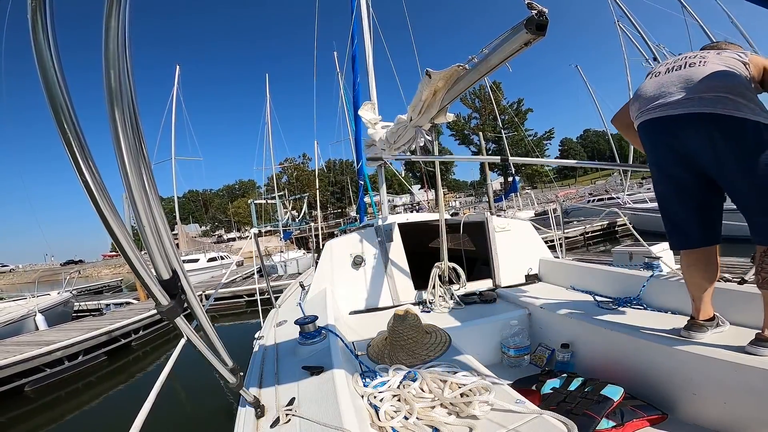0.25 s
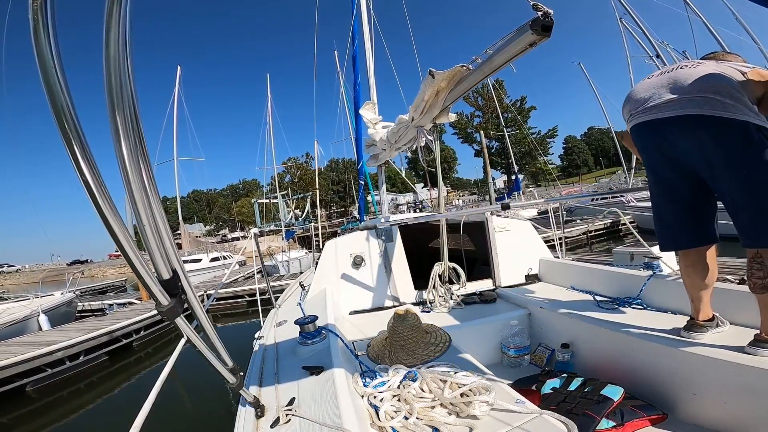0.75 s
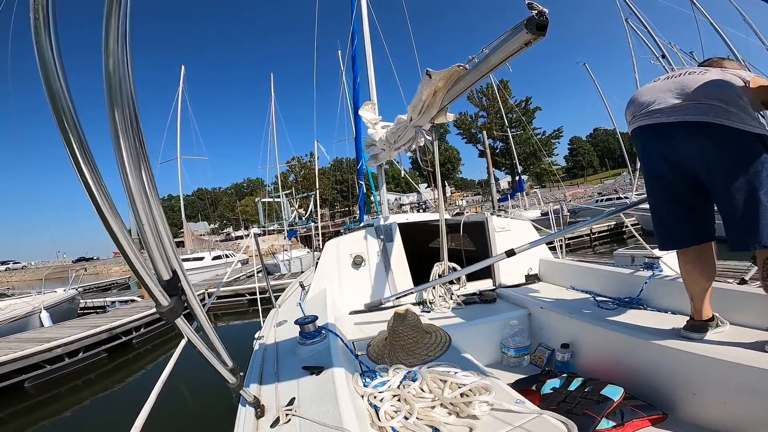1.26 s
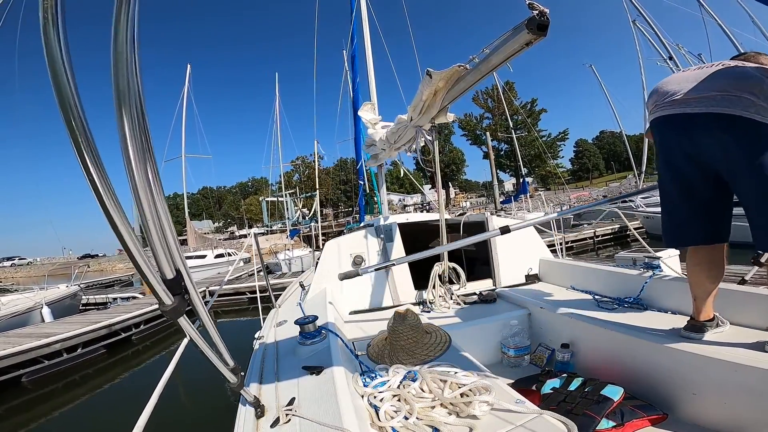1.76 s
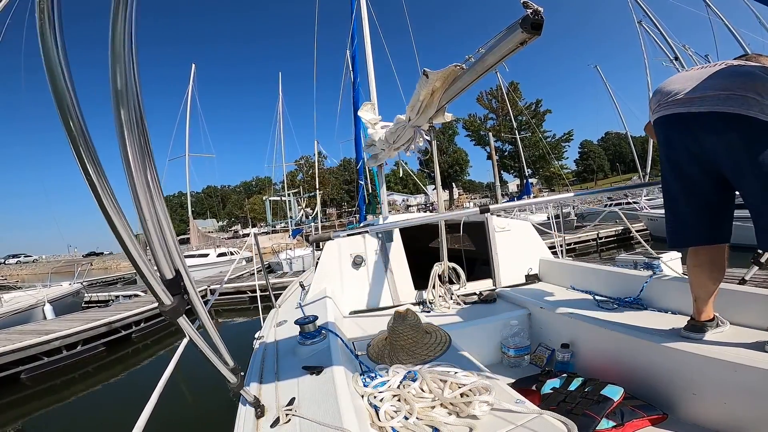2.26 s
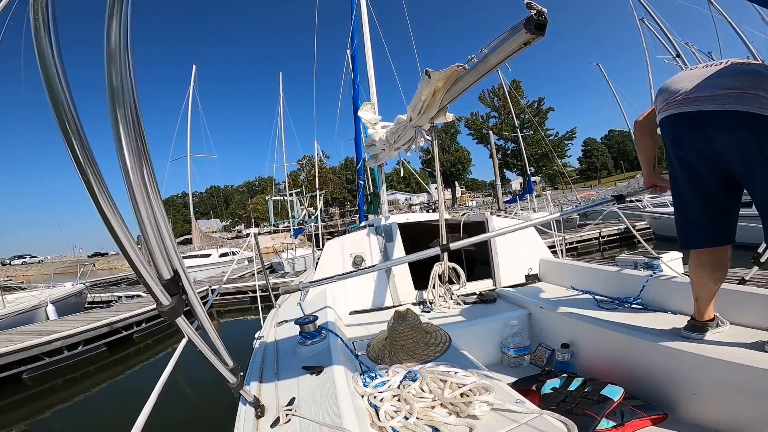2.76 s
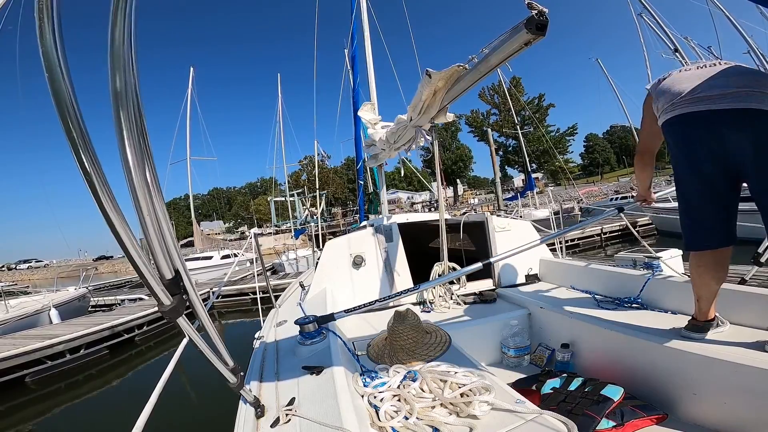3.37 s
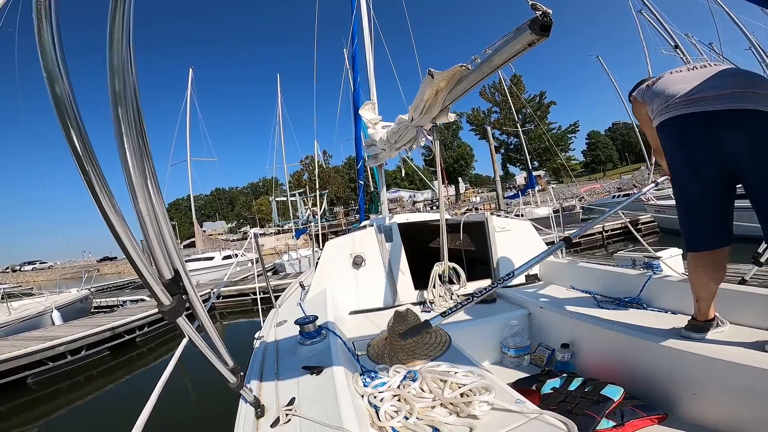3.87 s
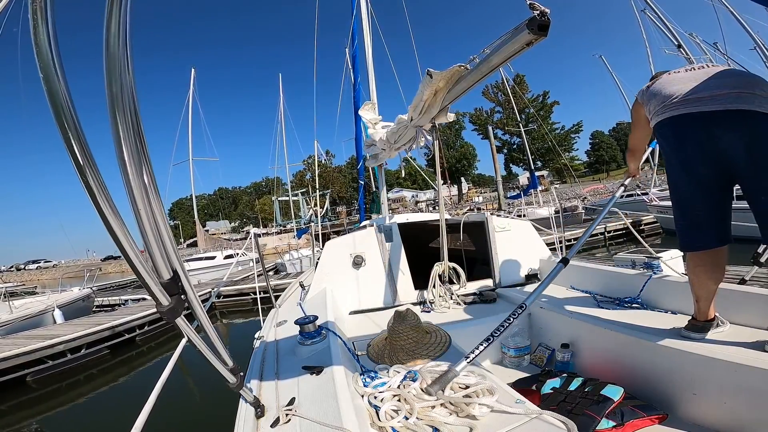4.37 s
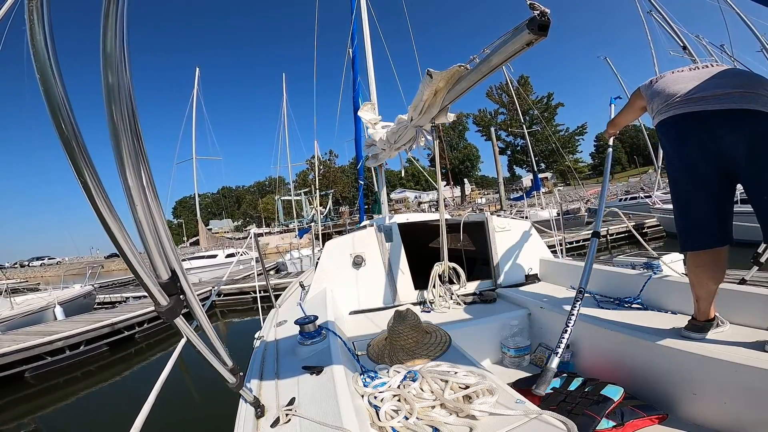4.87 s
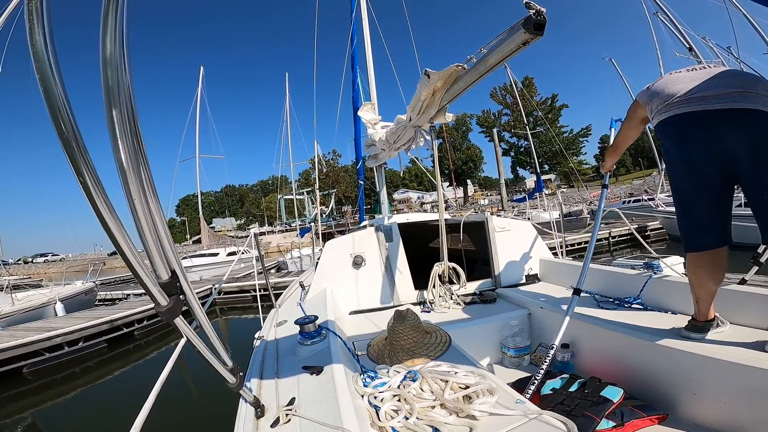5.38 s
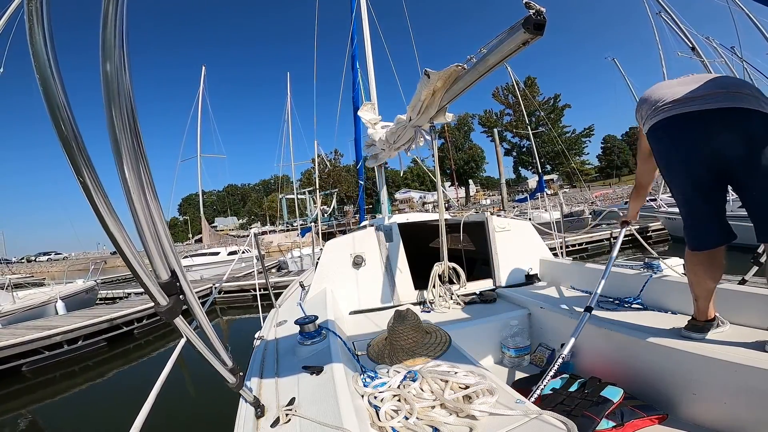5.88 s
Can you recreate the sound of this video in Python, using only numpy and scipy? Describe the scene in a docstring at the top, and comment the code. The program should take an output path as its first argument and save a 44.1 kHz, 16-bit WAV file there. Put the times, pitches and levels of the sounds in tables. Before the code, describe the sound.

Sparse hollow clatters of an aluminium pole on a boat, one hard clang with a metallic ring midway, later dull thuds, low wind rumble beneath.

```python
"""A metal pole swung about aboard a small moored yacht knocks on deck and fittings: short tube rings, deck rattle.
The hull booms under the blows in late, detuned panel modes; one blow rings a winch, a loose shackle tinkles.
A slack line chuffs against the mast in shaped noise, and the pole tip drags once over cloth in fine grains.
Noise-band whistles, gusty wind rumble, far hiss and a wavering hum lie beneath; cockpit and boats echo the blows."""
import sys
import numpy as np
from scipy import signal
from scipy.fft import rfft, irfft
from scipy.io import wavfile
from scipy.ndimage import uniform_filter1d

SR = 44100
rng = np.random.default_rng(int(sys.argv[2]) if len(sys.argv) > 2 else 0)


def volts_from_decibels(level):
    """Turn decibel levels (scalar or array-like) into linear amplitude factors."""
    exponent = np.asarray(level, float) / 20
    return 10 ** exponent


def bounce(signal):
    """Save signal as a 16-bit WAV file at the path given by the first command-line argument."""
    frames = np.transpose(np.atleast_2d(signal))
    limited = np.clip(frames, -1, 1)
    pcm = np.round(limited * 32767).astype(np.int16)
    wavfile.write(sys.argv[1], SR, pcm)


N = 270333
T = np.arange(N) / SR


def unit(x):
    """Scale to rms 1."""
    return x / np.sqrt(np.mean(x ** 2))


def on_log(table, hz):
    """Read a two-column curve on a log-frequency axis."""
    f, value = np.transpose(table)
    return np.interp(np.log(np.maximum(hz, 1)), np.log(f), value)


# stereo width of the noise beds: f/Hz, left-right likeness (0-1)
NOISE_LIKENESS = [(20, 0.7), (60, 1), (150, 0.97), (500, .8), (1500, 0.75), (4000, 0.04), (9000, 0.87)]


def noise(colour):
    """Stereo noise of rms 1 in the given colour; shared mid and opposed side set its width by frequency."""
    hz = np.arange(N // 2 + 1) * SR / N
    like = np.clip(on_log(NOISE_LIKENESS, hz), 0, 1)
    mid, side = rfft(rng.standard_normal((2, N)))
    left_right = np.array([[1], [-1]])
    pair = mid * np.sqrt(1 + like) + side * np.sqrt(1 - like) * left_right
    return unit(irfft(pair * volts_from_decibels(on_log(colour, hz)), N))


def walk(rate):
    """Random control curve of rms 1: levels held 1 / rate s, smoothed twice."""
    hold = int(SR / rate)
    steps = np.repeat(rng.standard_normal(N // hold + 1), hold)
    return unit(uniform_filter1d(uniform_filter1d(steps, hold), hold)[:N])


def wavering(hz, width_hz):
    """Two tones smeared into narrow noise bands by unrelated slow wobbles; joint rms 1."""
    lowpass = signal.butter(2, width_hz / 2, fs=SR, output="sos")
    smear = signal.sosfilt(lowpass, rng.standard_normal((2, 2, len(hz))))
    phase = 2 * np.pi * np.cumsum(hz) / SR
    return unit(smear[0] * np.cos(phase) + smear[1] * np.sin(phase))


def ring(modes, phase, rise_cycles, size):
    """Decaying modes whose swell is timed in cycles, so lows arrive late; scaled to peak 1."""
    hz, db, t60 = np.transpose(modes)[:, :, None]
    t = T[:size]
    swell = (1 - np.exp(-t * hz / rise_cycles)) ** 2
    decay = np.exp(-np.log(1000) * t / t60)
    tones = np.sin(2 * np.pi * hz * t + phase[:len(hz), None])
    out = (volts_from_decibels(db) * swell * decay * tones).sum(0)
    return out / np.abs(out).max()


def add(out, s, x, pan_db=0.):
    """Place a sound at time s; positive pan_db leans it left."""
    i = int(s * SR)
    x = x[:N - i]
    out[:, i:i + len(x)] += x * volts_from_decibels(np.array([[pan_db], [-pan_db]]) / 2)


# background level curves, before random gusts: t/s, wind rumble level/dB, marina hiss level/dB
AIR_LEVELS = [(0.0, -40.5, -53.5), (0.7, -41, -54), (1.0, -40, -54.5), (1.35, -36, -55.5),
              (1.55, -45.5, -55.5), (2.3, -40, -55.5), (2.9, -43.5, -53.5), (3.4, -42.5, -59),
              (4.05, -48, -58.5), (5.17, -46.5, -58.5), (5.4, -43, -58.5), (6.13, -47.5, -59)]
# colour of the wind rumble: f/Hz, level/dB
RUMBLE_COLOUR = [(8.8, -44), (15, -2), (54, -0.5), (81, -5), (119, -5.5), (142, -12.5), (308, -23.5),
                 (362, -37.5), (500, -43.5), (650, -80.5), (1100, -120)]
# colour of the marina hiss: f/Hz, level/dB
HISS_COLOUR = [(180, -9.5), (300, -9), (358, -8.5), (394, -4.5), (589, -9), (726, -5), (955, -5.5),
               (1470, -2.5), (4400, -16.5), (6900, -24), (8370, -26.5), (9670, -36.5), (11000, -56.5),
               (14000, -62.5)]
HUM_HZ, HUM_WIDTH_HZ, HUM_DB = 110.3, 9.0, -52.5


def air():
    """Gusty low noise for wind, smoother noise for far hiss, and a motor hum as a narrow wavering band."""
    s, rumble_db, hiss_db = np.transpose(AIR_LEVELS)
    lean_db = np.array([[.7], [-.7]])  # rumble is a little stronger on the left
    rumble_db = np.interp(T, s, rumble_db) + 3.5 * walk(6.5) + lean_db
    rumble = volts_from_decibels(rumble_db) * noise(RUMBLE_COLOUR)
    hiss_db = np.interp(T, s, hiss_db) + 1.1 * walk(13)
    hiss = volts_from_decibels(hiss_db) * noise(HISS_COLOUR)
    hum = wavering(np.full(N, HUM_HZ), HUM_WIDTH_HZ)[0]
    return rumble + hiss + volts_from_decibels(HUM_DB) * hum


# thin whistles: start t/s, end t/s, start f/Hz, end f/Hz, level/dB (before swell and flutter)
WHISTLE_GLIDES = [(0, .25, 7600, 7800, -69.5), (0.106, 0.531, 8300, 8700, -75),
                  (0.728, 1.155, 6000, 6000, -72), (0.848, 1.087, 8900, 8700, -70.5),
                  (1.001, 1.202, 7960, 9000, -70), (1.4, 1.752, 7800, 8380, -70),
                  (1.55, 1.943, 6230, 6000, -71), (1.697, 2.056, 8400, 8220, -71.5),
                  (2.026, 2.155, 6300, 6430, -69), (2.047, 2.201, 3780, 4000, -71),
                  (2.252, 2.457, 7100, 7050, -69.5), (2.643, 2.8, 7620, 7340, -70.5),
                  (2.778, 2.947, 3700, 3040, -63), (2.8, 2.959, 3960, 3970, -69),
                  (3.379, 3.558, 6700, 6690, -74), (3.677, 3.846, 4100, 3260, -71.5),
                  (3.963, 4.352, 4300, 4870, -72.5), (4.165, 4.28, 6810, 6430, -71),
                  (3.45, 4.04, 7230, 8210, -81.5), (4.6, 4.8, 8570, 8700, -79.5),
                  (4.85, 5.05, 8220, 8620, -78), (5.42, 5.89, 9170, 8150, -81)]
WHISTLE_WIDTH_HZ = 200
# fainter whistles at random times and pitches; level before swell and flutter
FAINT_COUNT, FAINT_DB, FAINT_S = 20, -77, 0.11


def whistles():
    """Faint gliding noise bands in the treble that swell, flutter and fade."""
    out = np.zeros((2, N))
    when = rng.uniform(0, T[-1], FAINT_COUNT)
    pitch = rng.uniform(5800, 8900, FAINT_COUNT)  # Hz
    glide = rng.uniform(-125, 375, FAINT_COUNT)  # Hz, mostly upward
    faint = zip(when, when + FAINT_S, pitch, pitch + glide, np.full(FAINT_COUNT, FAINT_DB))
    for start, end, from_hz, to_hz, db in [*WHISTLE_GLIDES, *faint]:
        share = np.linspace(0, 1, int((end - start) * SR))
        pair = wavering(from_hz + (to_hz - from_hz) * share, WHISTLE_WIDTH_HZ)
        swell = np.sqrt(np.sin(np.pi * share).clip(0))
        add(out, start, volts_from_decibels(db) * swell * (pair[0] + 0.67 * pair[1]))
    flutter = volts_from_decibels(3.0 * walk(25))
    return out * flutter


# colour of the cloth drag: f/Hz, level/dB
CLOTH_COLOUR = [(180, -29), (300, -1.5), (456, 1), (544, -15), (1250, 0.5), (2430, -4.5), (3690, -6),
                (8920, -23), (14000, -39)]
DRAG_S, DRAG_HOLD_S, DRAG_DB = 5.174, 0.067, -45
DRAG_ATTACK_DB_PER_S, DRAG_RELEASE_DB_PER_S = 1600, 293


def drag():
    """Dense fine noise grains while the pole tip slides over cloth."""
    early = np.maximum(DRAG_S - T, 0)
    late = np.maximum(T - DRAG_S - DRAG_HOLD_S, 0)
    db = DRAG_DB - DRAG_ATTACK_DB_PER_S * early - DRAG_RELEASE_DB_PER_S * late
    return volts_from_decibels(db + 1.6 * walk(180)) * noise(CLOTH_COLOUR)


# single brushes of the line: t/s, level/dB (before grain), length/s
SINGLE_BRUSHES = [(0.772, -61, .2), (1.195, -44, 0.06), (1.29, -54, 0.09), (1.392, -53.5, 0.054),
                  (4.127, -65, 0.045), (4.193, -63, 0.06), (5.43, -53.5, 0.05), (5.822, -61.5, 0.083)]
# colour of the line on the mast: f/Hz, level/dB
BRUSH_COLOUR = [(300, -17), (1000, -0.5), (1500, 0), (2800, -2), (3700, -2.5), (4200, 0), (5000, -5.5),
                (6000, -11), (8500, -11.5), (10000, -24.5), (12500, -22), (14000, -58)]
BRUSH_ATTACK_S, BRUSH_RELEASE_S = .007, .011
# the slack line swings evenly against the mast and leaves it once a swing, weaker as the swing dies
SWING_FIRST_S, SWING_PERIOD_S, SWINGS = 1.603, .1335, 11  # first: when the line first leaves the mast
SWING_DB, SWING_FADE_DB, SWING_SCATTER_DB = -54, -6.5, 0.5
BRUSH_S, BRUSH_SCATTER = .058, .08  # mean length, relative spread


def chuffs():
    """Grainy noise puffs with quick edges each time the line brushes the mast."""
    length_chance, level_chance = rng.standard_normal((SWINGS, 2)).T
    k = np.arange(SWINGS)
    lengths = BRUSH_S * (1 + BRUSH_SCATTER * length_chance)
    levels_db = SWING_DB + SWING_FADE_DB * (k / SWINGS) ** 2 + SWING_SCATTER_DB * level_chance
    leaves = SWING_FIRST_S + SWING_PERIOD_S * k
    swings = zip(leaves - lengths, levels_db, lengths)
    envelope = np.zeros(N)
    for s, db, length in [*SINGLE_BRUSHES, *swings]:
        attack = (T - s) / BRUSH_ATTACK_S
        release = (s + length - T) / BRUSH_RELEASE_S
        envelope += volts_from_decibels(db) * np.clip(np.minimum(attack, release), 0, 1)
    grain = volts_from_decibels(2.27 * walk(250))
    return envelope * grain * noise(BRUSH_COLOUR)


# a loose shackle tinkles when the pole jolts the rail: t/s, peak level/dB
TINKLE_HITS = [(0.281, -57), (0.3292, -60), (0.7203, -53), (2.4424, -57)]
# shackle modes: f/Hz, level/dB, t60/s
SHACKLE_MODES = [(10500, 0, 0.17), (10600, -3, .1), (11050, -4, .07), (11200, -4, .06)]


def tinkles():
    """Tiny steel parts ring in a few close modes high in the treble."""
    out = np.zeros((2, N))
    phases = rng.uniform(0, 2 * np.pi, (len(TINKLE_HITS), len(SHACKLE_MODES)))
    for (s, db), phase in zip(TINKLE_HITS, phases):
        add(out, s, volts_from_decibels(db) * ring(SHACKLE_MODES, phase, 10.0, size=SR // 4))
    return out


# winch drum modes: f/Hz, level/dB, t60/s
WINCH_MODES = [(1080, 15, .024), (2628, 0, .7), (3760, -26, .5), (3715, -26, .45), (3660, -28, .45),
               (5000, 2, .015), (7440, -8, .15), (7553, -13, .09), (8100, 18, .014), (8770, 15, .012)]
WINCH_S, WINCH_DB = 2.990, -10.5  # level is the peak before panning
TOUCH_S, TOUCH_LENGTH_S, TOUCH_DB = 3.105, .07, -7


def winch():
    """A steel drum rings on after the hardest blow; the pole falls back against it and damps it."""
    out = np.zeros((2, N))
    drum = ring(WINCH_MODES, np.zeros(len(WINCH_MODES)), 9.2, size=SR)
    add(out, WINCH_S, volts_from_decibels(WINCH_DB) * drum, pan_db=1.0)
    touch = np.clip((T - TOUCH_S) / TOUCH_LENGTH_S, 0, 1)
    return out * volts_from_decibels(TOUCH_DB * touch)


# hull thuds: t/s, peak level/dB, brightness tilt/(dB per octave), decay scale (times t60)
HULL_THUDS = [(0.293, -30.5, 1.5, 0.91), (0.335, -34, 2.5, 0.99), (0.738, -26, -1.5, .98),
              (0.948, -33.5, -6, 0.89), (1.21, -18.5, -5.5, 0.61), (1.238, -15.5, -6.5, 0.52),
              (1.262, -22.5, -2, .5), (1.289, -19, -3, 0.65), (1.327, -31.5, 0.5, 0.61),
              (2.459, -25.5, -6.5, 0.98), (2.989, -4, 1, 0.37), (3.0, -12.5, -4.5, 0.6),
              (3.027, -14.5, -2, 0.37), (3.047, -18, -2.5, 0.92), (4.128, -38.5, 1, 0.93),
              (4.178, -35, -3, 0.66), (5.402, -10.5, -2.5, 0.6), (5.42, -15.5, -1, 0.5),
              (5.438, -19, -2, .45), (5.475, -25, -7, 0.75), (6.077, -12, 0.5, 0.74), (6.095, -11, 1, 0.38)]
# hull panel modes before each thud's tilt, detuning and decay scale: f/Hz, level/dB, t60/s
HULL_MODES = [(43.7, -9.5, 0.21), (64.7, -10, 0.72), (90.7, 1.5, 0.24), (119.9, -3, .25),
              (168.2, -8.5, 0.26), (205, -1, 0.18), (242.3, -4.5, 0.17), (290.7, -4.5, 0.13),
              (344.4, -5, 0.17), (445.7, -11.5, 0.24), (620, -3.5, 0.14), (783, -11.5, 0.17)]


def thuds():
    """The blow spreads through the shell, so the panels near the contact boom late and out of step."""
    out = np.zeros((2, N))
    chance = rng.standard_normal((len(HULL_THUDS), 2, len(HULL_MODES)))
    for (s, db, tilt_db, scale), (phase, spread) in zip(HULL_THUDS, chance):
        modes = np.array(HULL_MODES) * [1, 1, scale]
        octaves = np.log2(modes[:, 0] / 150)
        modes[:, 1] += tilt_db * octaves - 3.55 * octaves ** 2
        modes[:, 0] *= 1 + 0.044 * spread
        add(out, s, volts_from_decibels(db) * ring(modes, .7 * phase, 0.53, size=SR // 2))
    return out


# pole knocks: t/s, tube peak level/dB, treble level/dB, tilt of the lower modes/(dB per octave),
# deck rattle level/dB (before its envelopes; relative to the tube)
POLE_KNOCKS = [(0.281, -14, -18.5, 14.5, -16.5), (0.327, -19.5, -18, 13, -23.5),
               (0.342, -24.5, -24, 5, -18.5), (0.719, -15.5, -14.5, 13, -13.5), (1.197, -20, -38, 5, -3.5),
               (1.215, -21.5, -2.5, -1, -13.5), (1.251, -26, -4, 25, -6.5), (1.265, -22.5, -14.5, 18, -5.5),
               (1.316, -37, -2, -4, -8), (1.404, -37.5, -9, 12, -12), (1.437, -41, -16, 2, -8),
               (1.71, -35, -10.5, 11.5, -13.5), (2.443, -12.5, -12, 14.5, -16.5), (2.477, -28, -13, 8, -10),
               (2.990, -4.5, 1, 0.5, -12), (3.097, -35.5, -19, -2.5, -6), (4.121, -46.5, -6, -8, -11.5),
               (5.403, -26.5, -15.5, 3.5, 1), (5.414, -30.5, -16.5, 7, -6.5), (6.077, -14.5, -19, 5, -10)]
# tube modes before each knock's pitch, tilt and decay changes: f/Hz, level/dB, t60/s
POLE_MODES = [(828, -3.5, 0.09), (1177, 8.5, .025), (1413, 0, 0.048), (1715, 0, 0.018), (1950, -7.5, .03),
              (2368, -3.5, 0.017), (3060, -0.5, 0.027), (3227, 8, 0.013), (4300, 5.5, 0.0054),
              (4863, -6, .035), (6000, -6.5, 0.018), (7800, -18.5, 0.027), (8700, -22.5, 0.0082)]
# the flatter the pole lands on deck, the more the deck rattles and the lower and shorter the tube rings
FREE_RATTLE_DB, FREE_RING, FREE_PITCH = -14.5, 1, 0.94  # ring and pitch are factors
RING_LOSS_PER_DB, PITCH_LOSS_PER_DB = 0.11, .012


def knocks():
    """The tube rings briefly, with strong upper modes when contact is hard; deck boards rattle after it."""
    out, size = np.zeros((2, N)), SR // 4
    chance = rng.standard_normal((len(POLE_KNOCKS), size))
    body = signal.butter(2, [350, 2400], "bandpass", fs=SR, output="sos")
    boards = signal.butter(2, [220, 750], "bandpass", fs=SR, output="sos")
    edge = signal.butter(2, [3000, 7500], "bandpass", fs=SR, output="sos")
    t = T[:size]
    for (s, db, treble_db, tilt_db, rattle_db), grit in zip(POLE_KNOCKS, chance):
        flat_db = max(rattle_db - FREE_RATTLE_DB, 0)
        scale = max(FREE_RING - RING_LOSS_PER_DB * flat_db, .2)
        modes = np.array(POLE_MODES) * [1, 1, scale]
        upper = modes[:, 0] > 2600
        modes[~upper, 0] *= FREE_PITCH - PITCH_LOSS_PER_DB * flat_db
        tilt = tilt_db * np.log2(modes[:, 0] / 1500)
        modes[:, 1] += np.where(upper, treble_db, tilt)
        tube = ring(modes, .6 * grit, 1.0, size=size)
        quick = (1 - np.exp(-t / 0.0024)) * np.exp(-t / (0.012 * scale))
        rattle = unit(signal.sosfilt(body, grit)) * quick
        # the wider boards answer later and lower
        slow = (1 - np.exp(-t / 0.012)) * np.exp(-t / 0.024)
        rattle += volts_from_decibels(-4.5) * unit(signal.sosfilt(boards, grit)) * slow
        crack = unit(signal.sosfilt(edge, grit)) * np.exp(-t / 0.0013)
        add(out, s, volts_from_decibels(db) * (tube + volts_from_decibels(rattle_db) * rattle + volts_from_decibels(treble_db - 1.5) * crack))
    return out


def cockpit_echo(blows):
    """Hard cockpit walls give each ear its own brief decaying noise tail."""
    tail = rng.standard_normal((2, SR // 8)) * np.exp(-T[:SR // 8] / 0.015)
    return signal.fftconvolve(blows, tail, axes=1)[:, :N]


def boats_echo(sound):
    """The moored boats send back a longer, dull tail that swells before it decays, the same for both ears."""
    t = T[:SR // 2]
    tail = rng.standard_normal((1, SR // 2)) * (1 - np.exp(-t / .03)) * np.exp(-t / 0.079)
    tail = signal.sosfilt(signal.butter(1, 2500, fs=SR, output="sos"), tail)
    return signal.fftconvolve(sound, tail, axes=1)[:, :N]


def scene():
    """Blows with the cockpit's short echo and a longer one off the moored boats, over the marina air."""
    blows = knocks() + winch() + tinkles()
    booms = thuds()
    echoes = volts_from_decibels(-33.5) * cockpit_echo(blows) + volts_from_decibels(-51.5) * boats_echo(blows + volts_from_decibels(-2) * booms)
    return blows + echoes + booms + chuffs() + drag() + whistles() + air()


def low_pass(x):
    """Removes everything above the highest recorded frequency."""
    return signal.sosfilt(signal.butter(12, 15540, fs=SR, output="sos"), x)


# phase between the microphone ports: f/Hz, lead of the left port/rad
PORT_LEAD = [(30, -0.66), (150, -0.053), (500, -0.43), (2800, -0.17), (4400, 0.51), (6200, -1.5),
             (8100, -1.9), (12000, -0.72)]
# microphone colour: f/Hz, level/dB
MIC_COLOUR = [(20, -3), (60, -1), (9000, -2), (12000, -5.5), (16000, -16.5)]


def record(dry):
    """Microphone colour, a phase turn split between the two ports, and softly rounded peaks."""
    hz = np.arange(N // 2 + 1) * SR / N
    turn = np.exp(.5j * on_log(PORT_LEAD, hz) * np.array([[1], [-1]]))
    wet = irfft(rfft(dry) * volts_from_decibels(on_log(MIC_COLOUR, hz)) * turn, N)
    wet = np.tanh(.8 * wet) / .8
    return low_pass(wet)


dry = scene()
out = record(dry)
bounce(out)
```